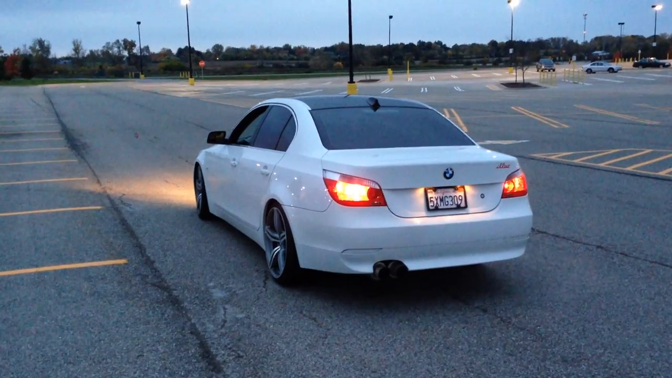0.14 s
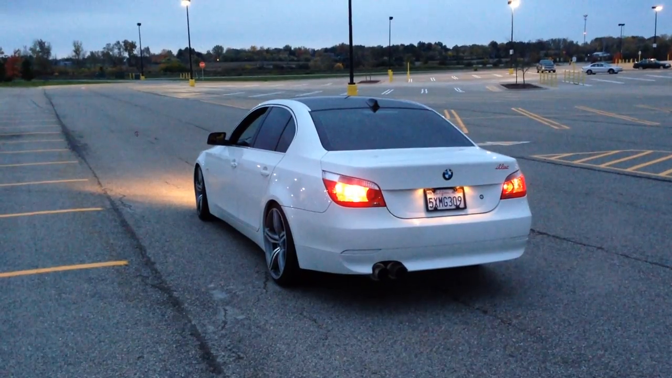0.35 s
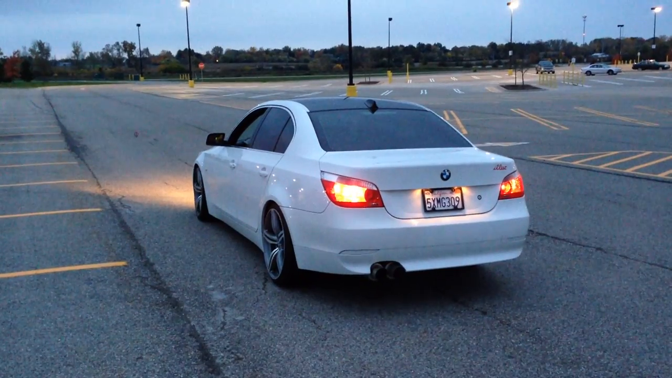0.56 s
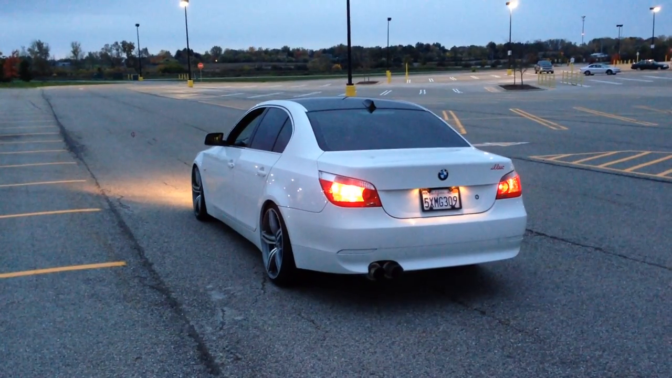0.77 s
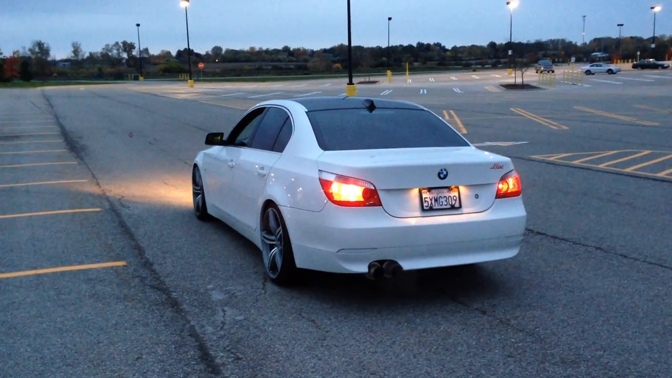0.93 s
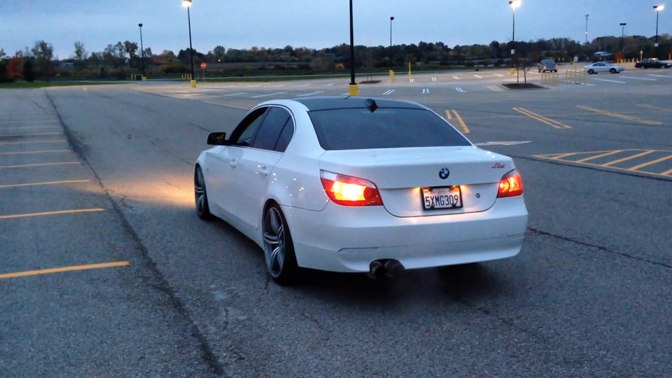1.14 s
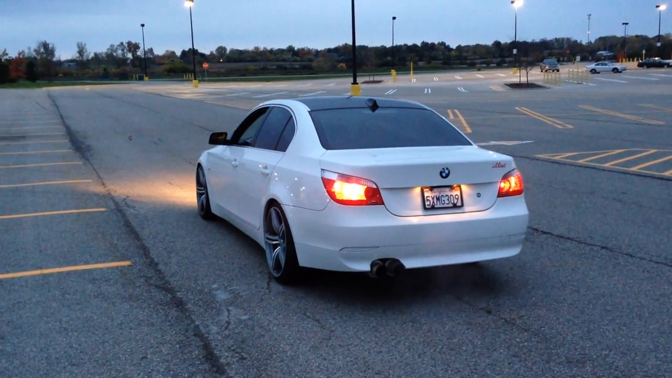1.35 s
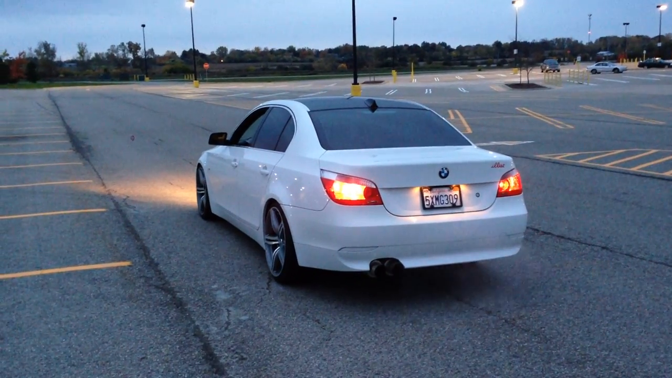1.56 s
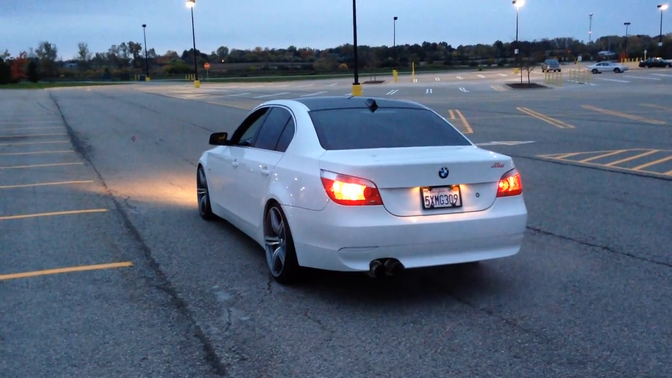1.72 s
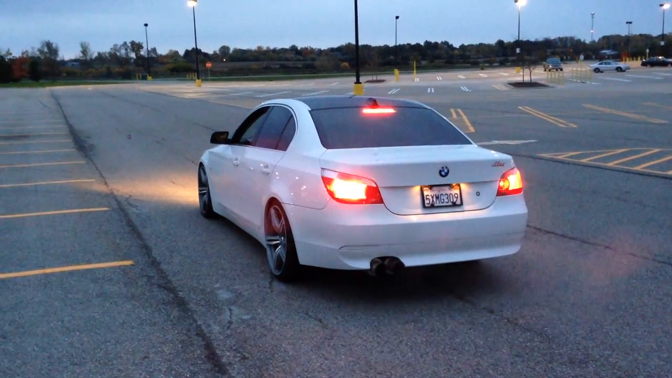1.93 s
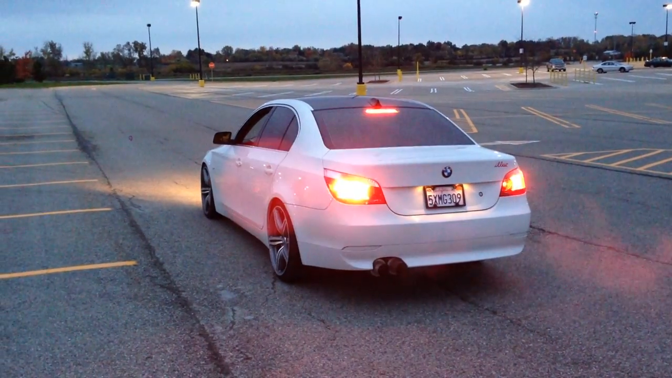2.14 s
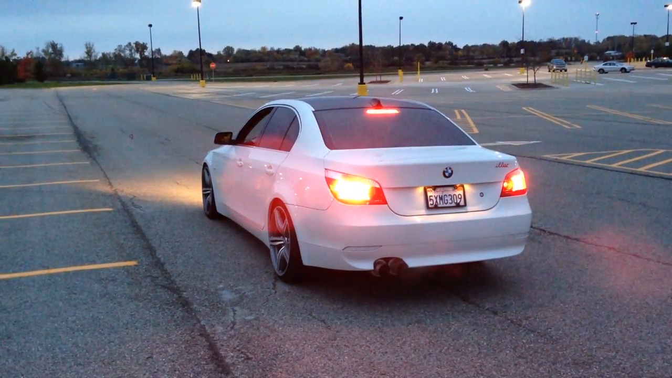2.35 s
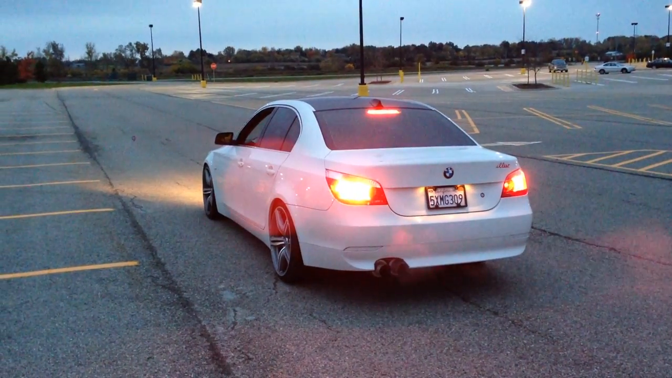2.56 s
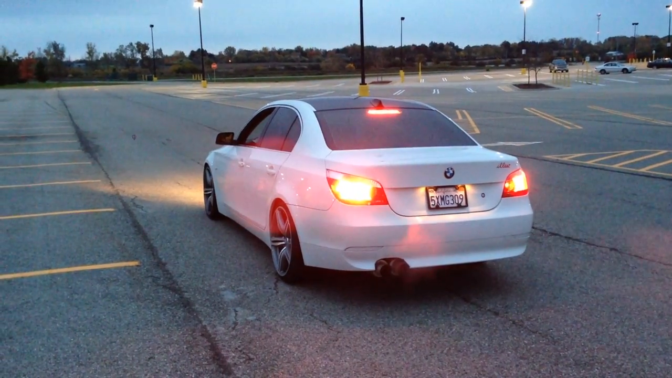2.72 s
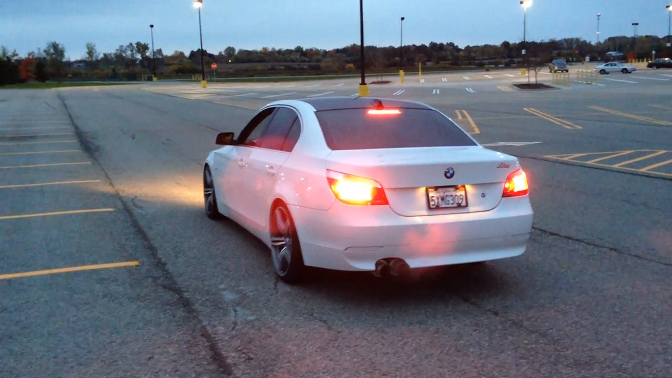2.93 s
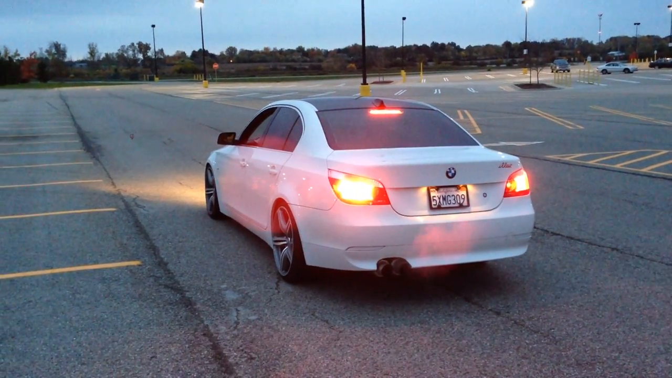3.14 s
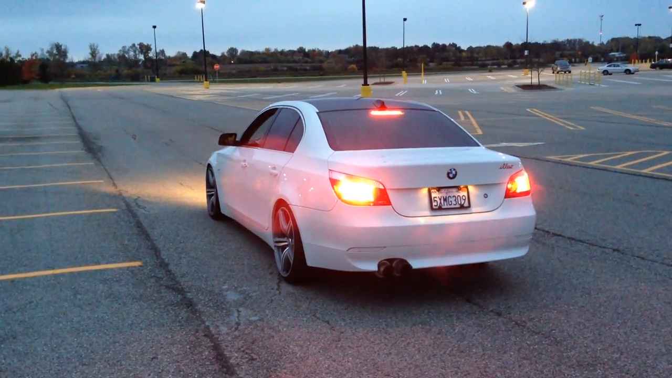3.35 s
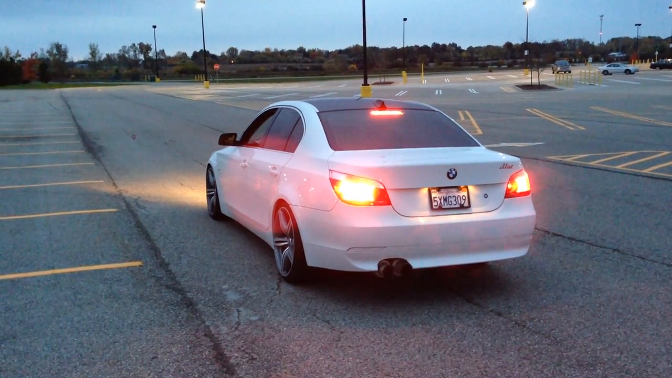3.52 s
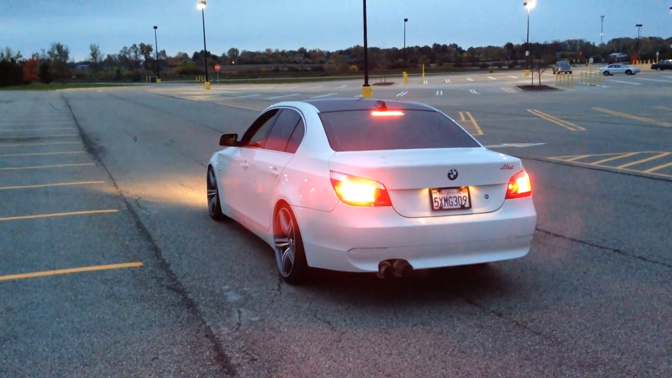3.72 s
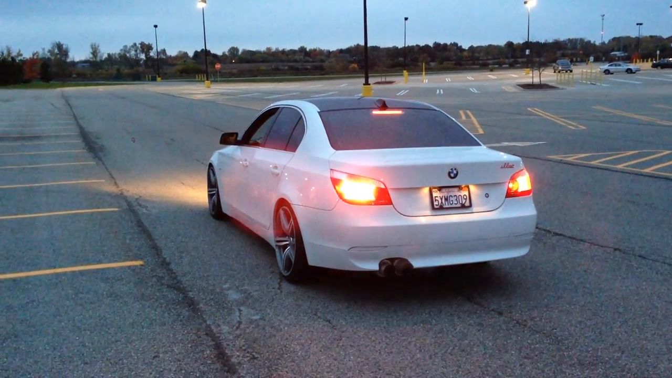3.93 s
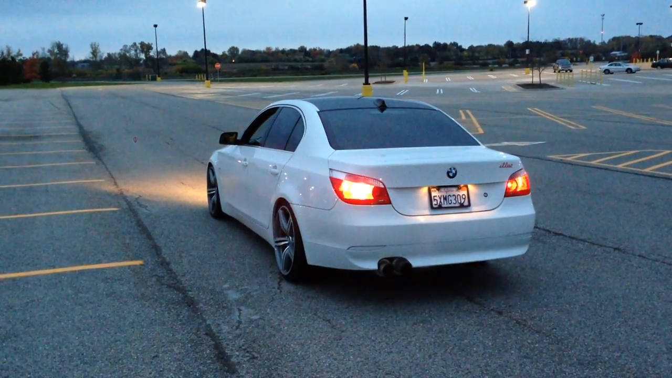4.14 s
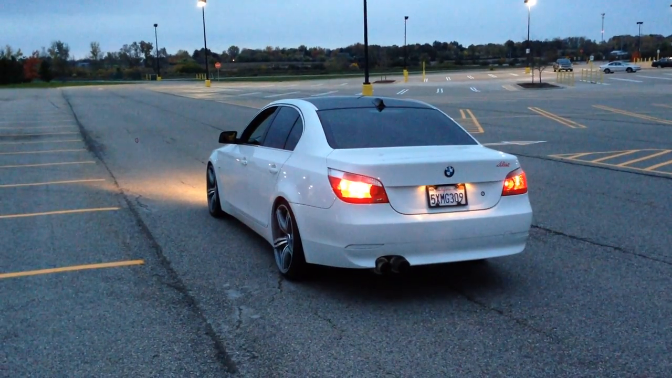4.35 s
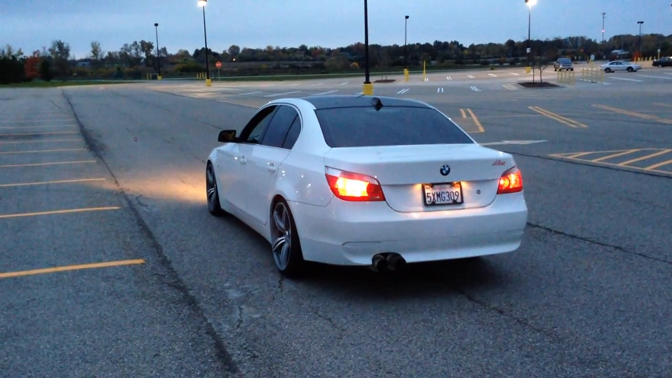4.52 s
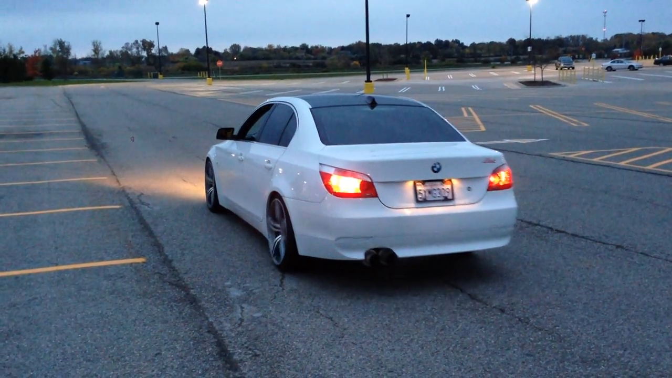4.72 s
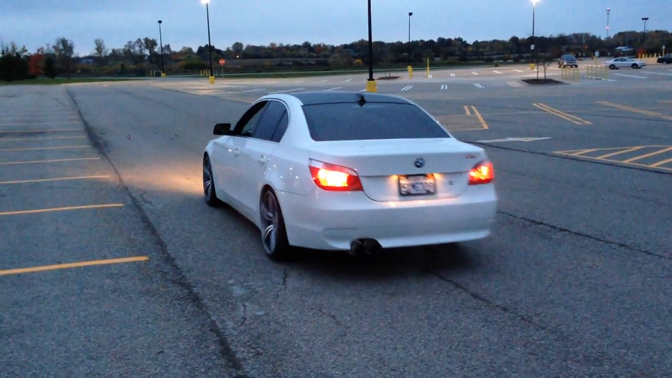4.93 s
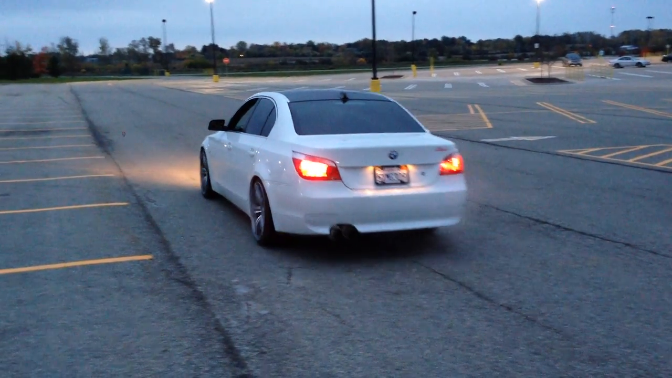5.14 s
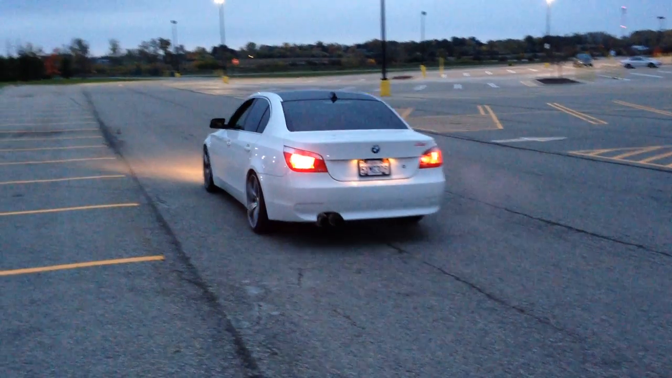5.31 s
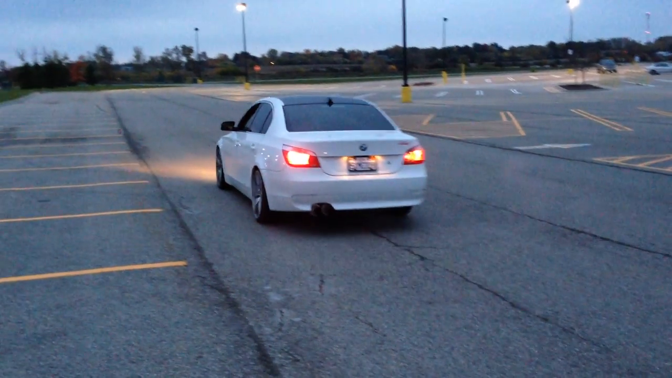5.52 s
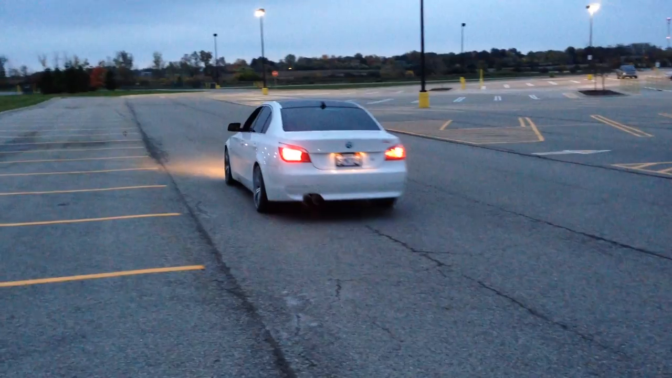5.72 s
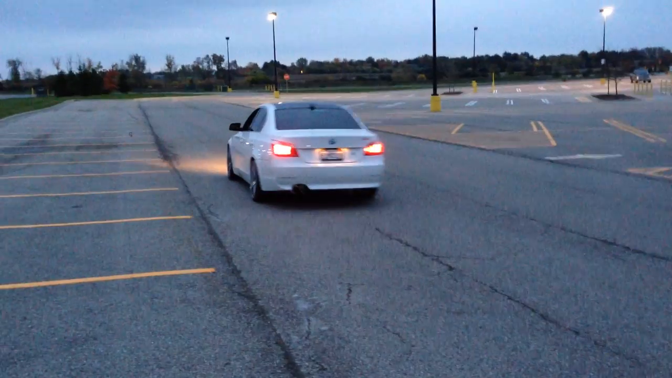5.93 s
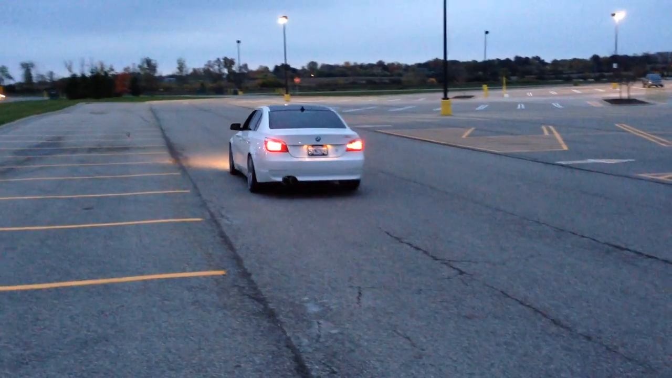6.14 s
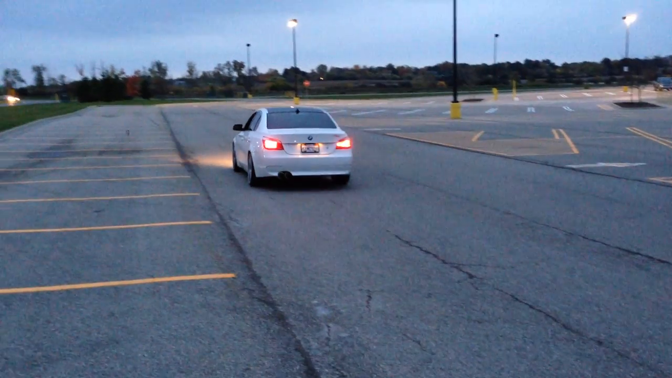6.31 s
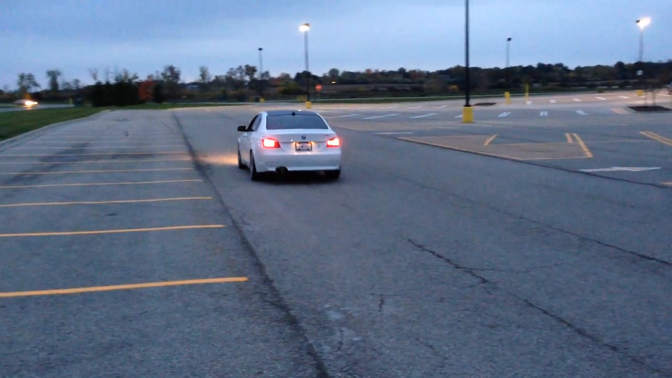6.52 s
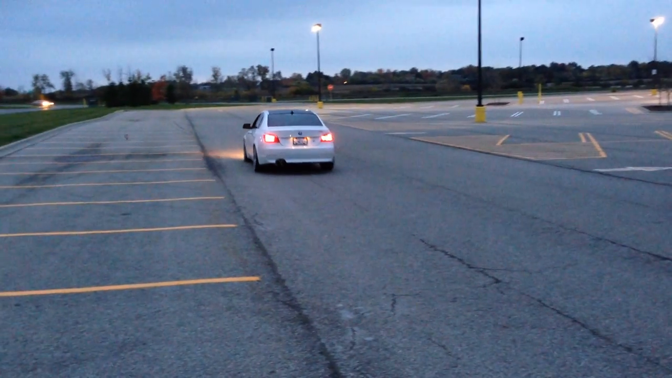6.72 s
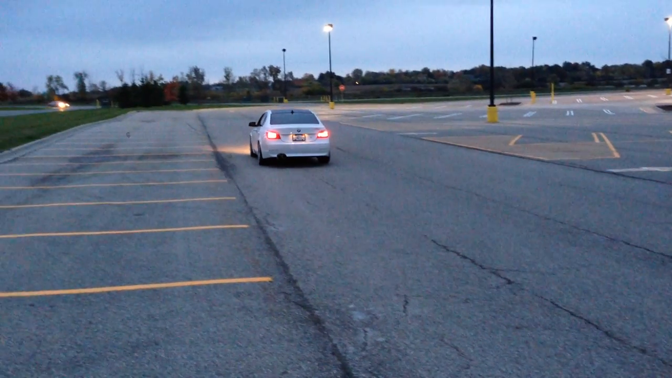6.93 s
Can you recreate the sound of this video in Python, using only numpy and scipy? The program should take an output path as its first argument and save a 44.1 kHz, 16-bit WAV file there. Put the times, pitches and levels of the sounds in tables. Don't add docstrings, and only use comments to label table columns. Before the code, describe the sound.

In an open lot, a microphone a few metres behind a standing car catches its loud six-cylinder exhaust over faint, steady far traffic. At 0 s a previous rev is dying, sinking to a soft low burble by 0.4 s. From about 0.8 s the throttle is blipped: a booming growl sweeps upward, peaking near 1.4 s, then falls with rough, uneven burbles and low thumps until about 2.7 s. A quiet, lumpy idle follows, with light mechanical whirr, a faint steady pump whine from about 3.6 s and tiny brake ticks near 3.8 s. At about 4.6 s the engine surges, with heavy thumps and small clicks of grit under the tyres. From 4.9 s the exhaust opens into a harder rasp, climbing steadily to a roar near 6.8 s, faint tyre hiss beneath, before pitch drops slightly at the end, around 7 s.

```python
import sys
import numpy as np
from scipy import signal
from scipy.fft import rfft, irfft
from scipy.io import wavfile
from scipy.ndimage import uniform_filter1d

SR = 44100
rng = np.random.default_rng(int(sys.argv[2]) if len(sys.argv) > 2 else 0)


def to_linear_factor(level_db):
    exponent = np.asarray(level_db, float) / 20
    return 10 ** exponent


def wrap_up_sound(samples):
    columns = np.atleast_2d(samples).T
    tamed = np.clip(columns, -1, 1)
    steps = np.round(tamed * 32767).astype(np.int16)
    wavfile.write(sys.argv[1], SR, steps)


N = 311787
T_S = np.arange(N) / SR


def in_time(rows):
    s, *columns = np.transpose(rows)
    return [np.interp(T_S, s, c) for c in columns]


def at_hz(points, hz):
    table_hz, db = np.transpose(points)
    return np.interp(np.log(hz), np.log(table_hz), db)


def response(points):
    size = 2 ** 15
    hz, db = np.transpose(points)
    grid_hz = np.arange(size // 2 + 1) * SR / size
    gain_db = np.interp(np.log(grid_hz + 1), np.log(hz), db)
    cepstrum = irfft(np.log(to_linear_factor(gain_db)), size)
    cepstrum[1:size // 2] *= 2
    cepstrum[size // 2 + 1:] = 0
    return grid_hz, rfft(cepstrum)


def colour(x, points):
    return signal.fftconvolve(x, irfft(np.exp(response(points)[1])))[:N]


def butter(x, hz, kind, order=4):
    return signal.sosfilt(signal.butter(order, hz, kind, fs=SR, output="sos"), x)


def even(x):
    power = uniform_filter1d(uniform_filter1d(x ** 2, size=4000), size=4000)
    return x / np.sqrt(power + 1e-20)


def drift(rate_hz):
    knots = rng.standard_normal(int(N / SR * 40) + 2)
    return np.interp(T_S * min(rate_hz, 40), np.arange(len(knots)), knots)


def noise(points, flicker_db):
    x = colour(rng.standard_normal(N), points)
    return x / np.std(x) * to_linear_factor(flicker_db * drift(13))


# (frequency [Hz], density [dB per Hz])
FAR = [(210, -34), (350, 3), (545, -6.5), (609, 0), (1030, 3.5), (1130, -0.5), (1430, -1), (2450, -8.5),
       (2970, -15.5), (4400, -15), (6540, -18), (14700, -19), (15400, -21)]


def far_traffic():
    return to_linear_factor(-59.5) * noise(FAR, flicker_db=.4)


# (time [s], firing rate [Hz])
SPEED = [(0, 83.34), (.37, 54.82), (.76, 48.37), (.9, 64.1), (1.12, 110.3), (1.35, 165.3), (1.45, 173.3),
         (1.62, 158.1), (2.72, 59.9), (3.6, 35.24), (4.52, 37.53), (4.65, 50.67), (4.9, 87.6),
         (5.05, 100.3), (5.45, 114.4), (6.3, 187.2), (6.82, 226), (7.07, 182)]


def firing_rate():
    log_rate = np.log(in_time(SPEED)[0])
    return np.exp(uniform_filter1d(log_rate, size=2600, mode="nearest"))


LUMPY_DB, LUMPY_BELOW_HZ = 4, 75
HUNT_CYCLES = .045


def firing_count(per_s):
    return np.cumsum(per_s) / SR + HUNT_CYCLES * drift(25) / (1 + (per_s / LUMPY_BELOW_HZ) ** 4)


# (time [s], pulse strength [dB], sharpness [dB per octave],
#            bank mismatch [dB], burn unevenness [dB])
THROTTLE = [(0, -18.5, -0.5, -16.5, -3), (.4, -45, -1, 7.5, 14.8), (.75, -41, 2.5, -15, 10.5),
            (.9, -19, 0.2, -10.5, 1), (1.05, -16, 2.5, -7, 8), (1.38, -9.5, 1.5, -1, -6),
            (1.6, -15, 4.3, 2.5, 5.5), (1.9, -24, 3, -4, 6.2), (2.4, -24, -0.5, -2, -0.7),
            (2.8, -40, -1.5, 0.5, 10.5), (3.3, -42.5, 0.5, -6.5, 8), (4.56, -39.5, 3.7, -4, 5),
            (4.72, -14, -1.6, -4.5, 2.2), (5.3, -20, 3.2, -5, 0.1), (5.9, -14.5, -3.5, -1.5, -4.5),
            (6.35, -11.5, 2.1, -0.5, -6), (6.8, -13.5, 2.5, 1, -5.5), (7.07, -16, -1.2, 0, -0.5)]


def throttle():
    return in_time(THROTTLE)


# (frequency [Hz], gain [dB])
PIPE = [(20, -36), (45, -12.5), (70, -7.5), (88, -1.5), (107, 6.5), (135, -2), (180, -11), (215, -12.5),
        (260, -7.5), (320, -24.5), (400, -40.5), (460, -42), (530, -39), (640, -53), (900, -56.5)]


def exhaust(per_s, fired, *order_db):
    grid_hz, log_gain = response(PIPE + [(1500, -98)])
    slow = np.arange(0, N, 32)
    out = np.zeros(N)

    def pipe(k):
        return np.interp(per_s[slow] * k / 2, grid_hz, log_gain)

    own_db = dict(zip([1, 2, 3, 4, 5, 6, 8, 9], order_db))
    for k in range(1, 23):
        leader = k if k in own_db else 8 + k % 2
        spread_db = .8 if k == 2 else 2.2
        line_db = own_db[leader][slow] + 2.5 + spread_db * drift(13)[slow] - 1.5 * (k - leader)
        gain = to_linear_factor(line_db) * np.exp((pipe(k) - pipe(leader)).real)
        gain = gain * to_linear_factor(-220 / per_s[slow] * (k == 7))
        gain = np.interp(np.arange(N), slow, gain)
        lag = np.interp(np.arange(N), slow, pipe(k).imag)
        late = np.pi / 2 * (k % 2)
        out -= gain * np.cos(np.pi * k * fired + lag + late)
    return out


ORDER_DB = [1.65, -2, -0.2, 0.1, -2, -2.5, -2]
# (frequency [Hz], level over pulse strength [dB])
HALF_LINE = [(18, -20), (40, -11.5), (52, -1.5), (60, -13.5), (70, -28.5), (80, -29), (92, -13), (110, -7)]
# (frequency [Hz], gain [dB])
FLAP = [(300, 0.48), (370, 6), (440, 9.2), (530, 12), (640, 7.5), (820, 3), (1100, 0.5)]
FLAP_FAR = 0.25


def order_levels(per_s, pulse_db, sharp_db, mismatch_db, half_db):
    opened = flap() * (1 + FLAP_FAR * distance_doublings())
    levels = [pulse_db + mismatch_db + half_db + at_hz(HALF_LINE, per_s / 2)]
    for k, own_db in zip([2, 3, 4, 5, 6, 8, 9], ORDER_DB):
        line_hz = per_s * k / 2
        source_db = pulse_db + own_db + sharp_db * np.log2(k / 2) + mismatch_db * (k % 2)
        levels.append(source_db + at_hz(PIPE, line_hz) + opened * at_hz(FLAP, line_hz))
    return levels


def lumps(per_s, fired):
    chance = rng.standard_normal(N // 40)
    spread_db = LUMPY_DB / (1 + (per_s / LUMPY_BELOW_HZ) ** 2)
    each = np.interp(fired, np.arange(len(chance)), chance)
    return to_linear_factor(spread_db * each - 0.24 * spread_db ** 2)


# (frequency [Hz], gain [dB])
RUMBLE = [(12, -8), (25, -15.5), (40, -7.5), (70, -1), (105, 6), (140, -6.5), (190, -17.5), (300, -43),
          (600, -71), (2000, -130)]
# (frequency [Hz], gain [dB])
BARK = [(100, -40.5), (180, -10), (255, 1.5), (310, -3), (370, -18.5), (530, -37), (700, -40), (1200, -70),
        (3000, -130)]
# (level [dB], share of pulse dB, share of pipe boom, speed slope [dB per octave], share of sharpness upsets)
UNEVEN_LAW = [
    (-20, 0.99, 0.77, -6, -0.88),
    (-25, 1.07, 0.11, -0.2, 1.8),
]
HALF_LINE_DB = -2


def uneven_burning(per_s, fired, pulse_db, uneven_db, edge_db):
    boom_db = np.maximum(at_hz(PIPE, per_s), at_hz(PIPE, per_s / 2) + HALF_LINE_DB)
    levels = []
    for db, share, boom, octave_db, edge in UNEVEN_LAW:
        load_db = db + uneven_db + share * pulse_db + boom * boom_db
        levels.append(load_db + octave_db * np.log2(per_s / 100) + edge * edge_db)
    rumble_db, bark_db = levels
    at = np.flatnonzero(np.diff(np.floor(fired), prepend=-1))
    chance = rng.standard_normal((N // 40, 2))[:len(at)].T
    pulses = to_linear_factor(-31.5) * rng.standard_normal((2, N))
    pulses[:, at] += chance * np.abs(chance) ** 1.3
    rumble = even(colour(pulses[0], RUMBLE))
    bark = even(colour(pulses[1], BARK))
    return to_linear_factor(rumble_db + 9.0) * rumble + to_linear_factor(bark_db + 7.5) * bark


# (frequency [Hz], density [dB per Hz])
RASP = [(250, -49), (380, 0.5), (500, 3.5), (650, 1), (800, -3.5), (950, -11.5), (1400, -41.5)]
# (frequency [Hz], density [dB per Hz])
WHIRR = [(530, -26.5), (900, -4.5), (1040, 1.5), (1130, -1.5), (1470, 2.5), (1890, -2), (2360, 2.5),
         (3000, -13.5), (3900, -43.5), (6600, -120)]
# (frequency [Hz], density [dB per Hz])
HISS = [(1760, -46.5), (3000, -12.5), (3190, -3.5), (3910, 1), (5150, -2.5), (5890, -9), (7000, -8.5),
        (8210, -11), (8890, -18), (10200, -16.5), (11900, -26), (13000, -35.5)]
# (level at 100 firings/s [dB], speed slope [dB per octave], share of pulse dB, [dB per doubled distance])
BAY = [
    (-46, 1, 0.62, 2.5),
    (-52, 7.5, 0.0665, 0.2),
    (-54.5, 6.5, 0.23, -1.5),
]
FLAP_RASP_DB, BAY_FLICKER_DB = 4.5, .5


def engine_bay(per_s, fired, throttle_db):
    load_db = uniform_filter1d(throttle_db, size=7000, mode="nearest")
    far = distance_doublings()
    octaves = np.log2(per_s / 100)
    rasp_db, whirr_db, hiss_db = (db + octave_db * octaves + share * load_db + far_db * far
                                  for db, octave_db, share, far_db in BAY)
    throb = to_linear_factor(0.33 * np.cos(2 * np.pi * fired))
    jets = to_linear_factor(rasp_db + FLAP_RASP_DB * flap()) * noise(RASP, flicker_db=2.5)
    whirr = to_linear_factor(whirr_db) * noise(WHIRR, BAY_FLICKER_DB)
    hiss = to_linear_factor(hiss_db) * noise(HISS, BAY_FLICKER_DB)
    return throb * (jets + whirr + hiss)


# (centre [Hz], width [Hz], level [dB])
WHINES = [
    (766, 62, -69.5),
    (5120, 14, -80.5),
]


def whines():
    out = np.zeros(N)
    for hz, width_hz, db in WHINES:
        edges_hz = [hz - width_hz / 2, hz + width_hz / 2]
        out += to_linear_factor(db) * even(butter(rng.standard_normal(N), edges_hz, "band", order=1))
    return out


# (time [s], half length [s],
# pulse [dB], half-rate line [dB], sharpness [dB per octave])
UPSETS = [(0.522, 0.024, 0, .1, 0.5), (.68, .05, -0.5, .1, -1.5), (1.478, 0.039, -13.5, 13, 3.5),
          (1.555, 0.061, -2.5, 15, -1.5), (3.082, 0.036, -1.5, 2, 1.5), (3.238, .055, 2, .1, -6.5),
          (3.56, .05, -2, .1, 2.9), (3.814, 0.031, -9, .1, -0.5), (4.17, 0.057, 5.5, 3, -2.5),
          (4.269, 0.037, -2.5, .1, .1), (4.845, 0.024, 1, -9, 2.5), (4.954, 0.039, 6, 1, -0.3),
          (5.463, 0.052, 2.3, 6, -2.1), (1.31, 0.07, 0.6, -9.5, 0.3), (1.93, .05, -1.2, -4, 1.3),
          (5.63, 0.092, -1, -5, 2), (6.202, 0.089, -0.6, -6.5, -7)]


def upsets():
    total = np.zeros((3, N))
    for s, half_s, *change_db in UPSETS:
        bell = np.exp(-.5 * ((T_S - s) / half_s) ** 2)
        total += bell * np.array(change_db)[:, None]
    return total


# (time [s], peak [dB])
THUMPS = [(0.876, -33.5), (1.041, -8), (1.109, -20), (1.511, -32), (2.017, -25.5), (2.191, -36),
          (2.262, -25), (2.549, -34), (4.677, -23), (4.768, -20), (4.947, -14.5), (5.1, -18), (5.198, -21),
          (5.402, -20.5), (5.543, -21), (6.404, -30), (6.699, -27), (6.929, -24)]
THUMP_HZ, THUMP_T60_S, THUMP_RISE_S = 48, 0.097, 0.0035


def thumps():
    out, t = np.zeros(N + SR), np.arange(SR // 4) / SR
    envelope = to_linear_factor(-60 * t / THUMP_T60_S) * np.minimum(t / THUMP_RISE_S, 1)
    push = np.sin(2 * np.pi * THUMP_HZ * t) * envelope
    for s, db in THUMPS:
        out[round(s * SR):][:len(t)] += to_linear_factor(db) * push / push.max()
    return out[:N]


# (time [s], level [dB], pitch [Hz])
PUMP = [
    (3.45, -95, 594),
    (3.6, -67, 584),
    (3.72, -63, 593),
    (4.2, -68, 595),
    (4.62, -74, 588),
    (4.7, -90, 580),
]


def pump():
    db, hz = in_time(PUMP)
    return to_linear_factor(db + 2.5 * drift(22)) * np.sin(2 * np.pi * np.cumsum(hz) / SR)


# (time [s], level [dB],
# centre [Hz], t60 [s])
TICKS = [(3.785, -57, 3500, .12), (3.865, -52, 3600, .2), (3.872, -50, 1500, .22), (3.895, -53, 3000, .15),
         (4.677, -35, 1400, .015), (4.932, -46, 700, .2), (4.932, -49, 2500, .02), (4.895, -54, 4500, .3),
         (4.977, -45, 2000, .015), (5.042, -41, 6000, .012), (5.015, -47, 1500, .015),
         (5.047, -48, 4500, .1), (5.066, -42, 4200, .012)]


def ticks():
    out, t = np.zeros(N), np.arange(SR // 4) / SR
    for s, db, hz, t60_s in TICKS:
        shake = rng.standard_normal(len(t)) * to_linear_factor(-60 * t / t60_s)
        shake[0] = 4
        edges_hz = [hz * .5, min(hz * 2, 15000)]
        out[round(s * SR):][:len(t)] += to_linear_factor(db) * butter(shake, edges_hz, "band", order=2)
    return out


START_M, LEAVES_S, PULL_M_S2 = 5, 4.64, 4.5


def distance_doublings():
    t = np.maximum(T_S - LEAVES_S, 0)
    return np.log2(1 + PULL_M_S2 * t ** 2 / 2 / START_M)


# (frequency [Hz], density [dB per Hz])
TYRES = [(1530, -33.5), (2600, -8), (2990, -8.5), (3970, 5.5), (5890, -12), (6970, -3.5), (8920, -17.5),
         (10100, -17), (14000, -31)]
TYRE_DB, TYRE_SPEED_POWER, TYRE_FAR_DB = -70.5, 1.33, -8.5


def tyres():
    speed_m_s = PULL_M_S2 * np.maximum(T_S - LEAVES_S, 0)
    level = to_linear_factor(TYRE_DB + TYRE_FAR_DB * distance_doublings()) * speed_m_s ** TYRE_SPEED_POWER
    return level * noise(TYRES, BAY_FLICKER_DB)


FLAP_S, FLAP_OPENS_S = 4.9, .08


def flap():
    return np.clip((T_S - FLAP_S) / FLAP_OPENS_S, 0, 1)


def scene():
    per_s = firing_rate()
    fired = firing_count(per_s)
    throttle_db, sharp_db, mismatch_db, uneven_db = throttle()
    upset_db, half_db, edge_db = upsets()
    pulse_db = throttle_db + upset_db
    order_db = order_levels(per_s, pulse_db, sharp_db + edge_db, mismatch_db, half_db)
    car = lumps(per_s, fired) * exhaust(per_s, fired, *order_db)
    car = car + uneven_burning(per_s, fired, pulse_db, uneven_db, edge_db)
    car = car + engine_bay(per_s, fired, throttle_db)
    car = car + whines() + thumps() + pump() + ticks() + tyres()
    return (far_traffic() + car)[None]


def top_cut(x):
    return signal.sosfilt(signal.butter(12, 15530, fs=SR, output="sos"), x)


SKEW, SKEW_HZ = 1.1, [18, 55]
TOP, KNEE = .76, 6


def record(dry):
    skewed = dry + SKEW * butter(dry ** 2, SKEW_HZ, "band", order=2)
    mix = skewed / (1 + np.abs(skewed / TOP) ** KNEE) ** (1 / KNEE)
    return top_cut(mix)


dry = scene()
out = record(dry)
wrap_up_sound(out)
```